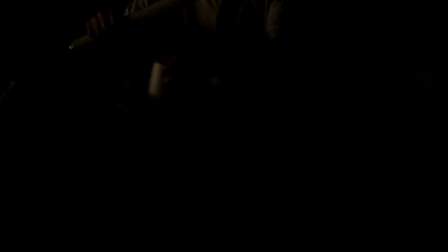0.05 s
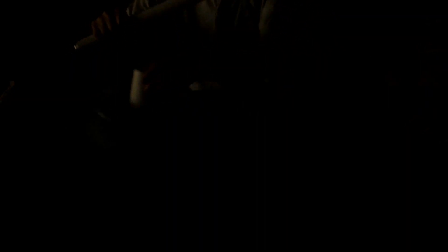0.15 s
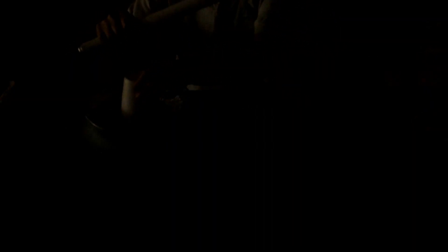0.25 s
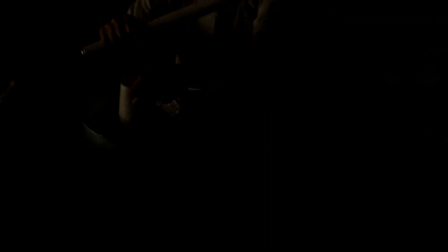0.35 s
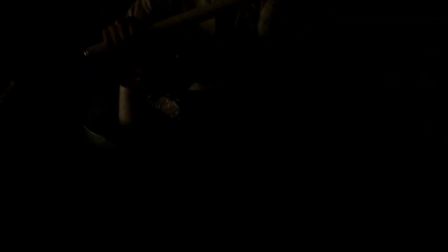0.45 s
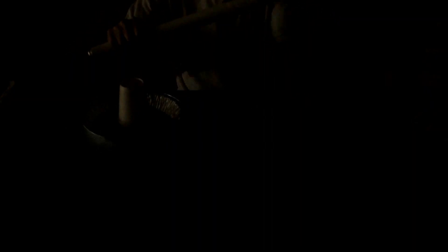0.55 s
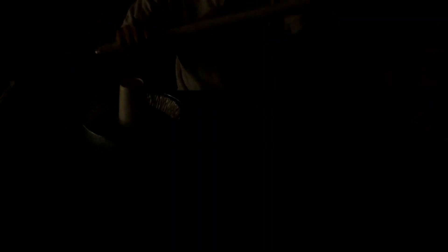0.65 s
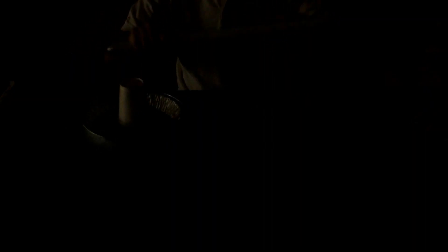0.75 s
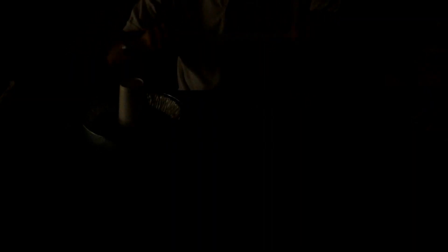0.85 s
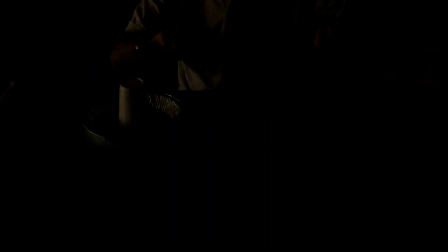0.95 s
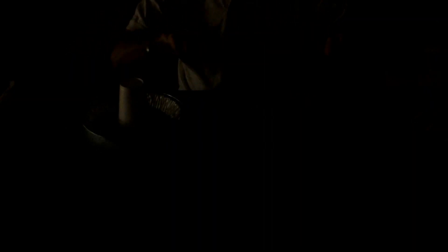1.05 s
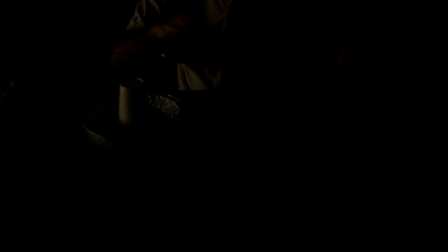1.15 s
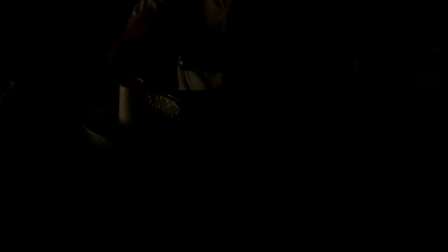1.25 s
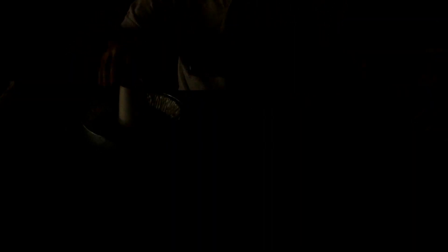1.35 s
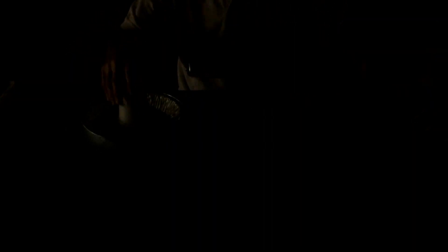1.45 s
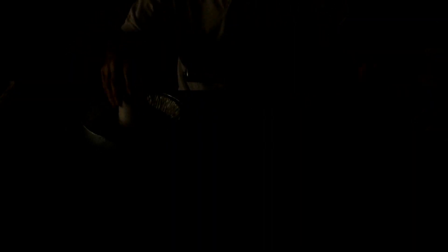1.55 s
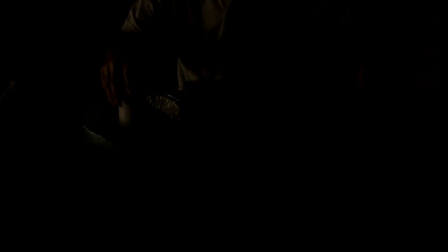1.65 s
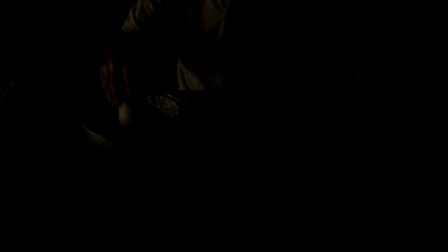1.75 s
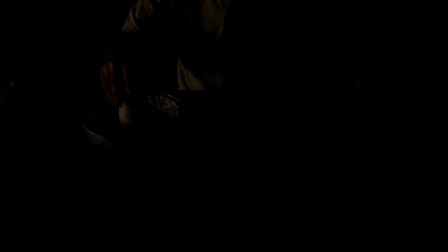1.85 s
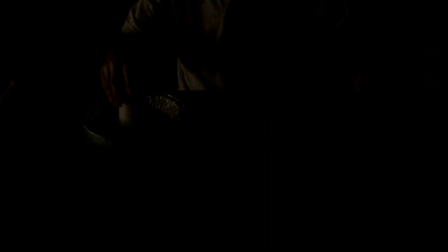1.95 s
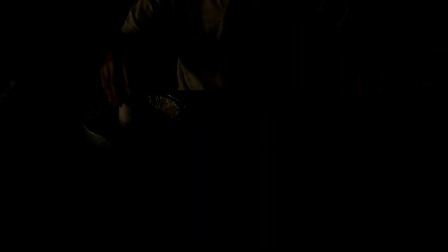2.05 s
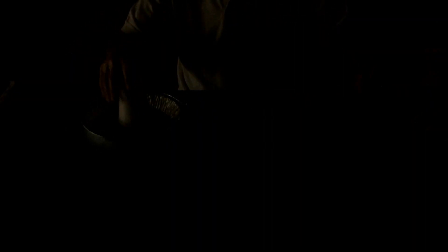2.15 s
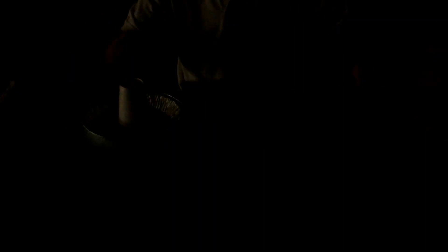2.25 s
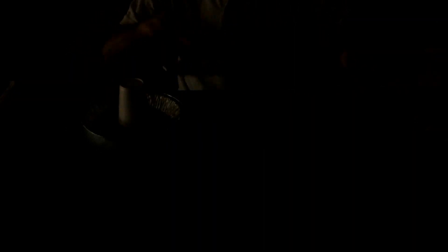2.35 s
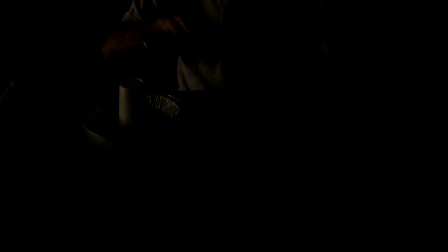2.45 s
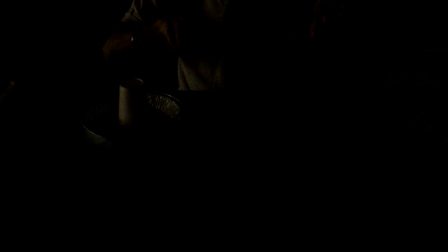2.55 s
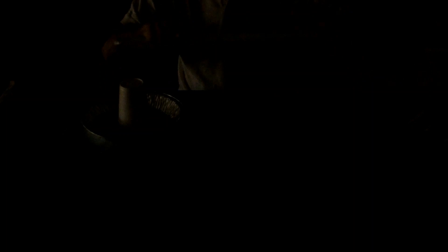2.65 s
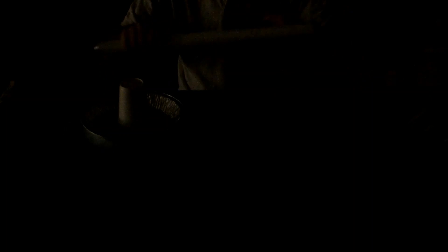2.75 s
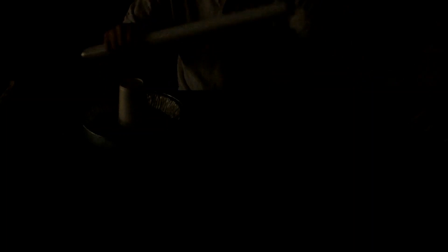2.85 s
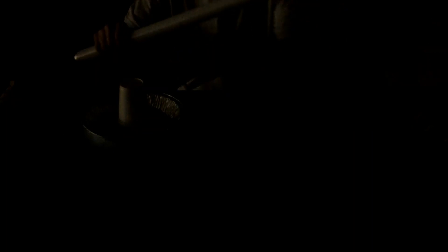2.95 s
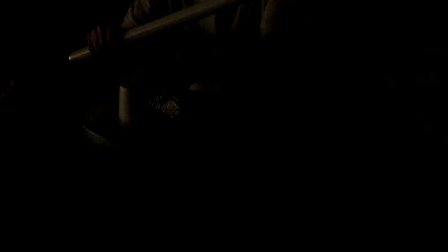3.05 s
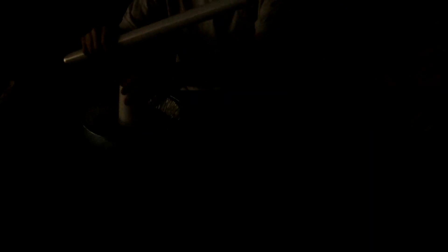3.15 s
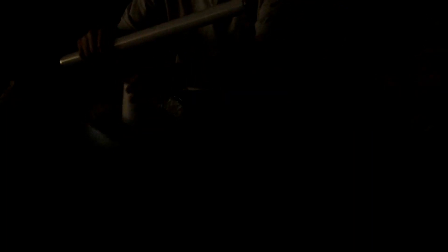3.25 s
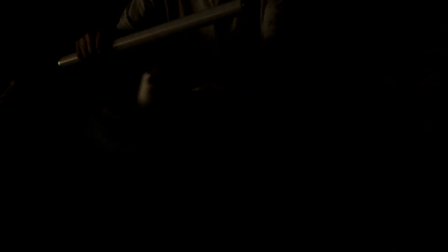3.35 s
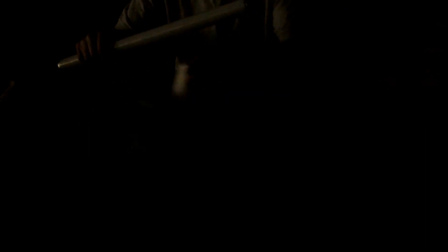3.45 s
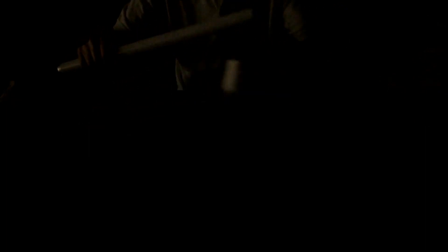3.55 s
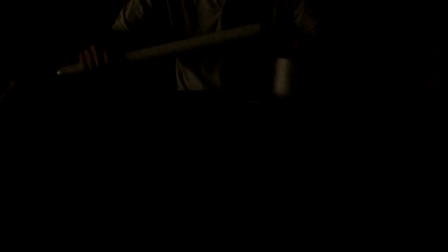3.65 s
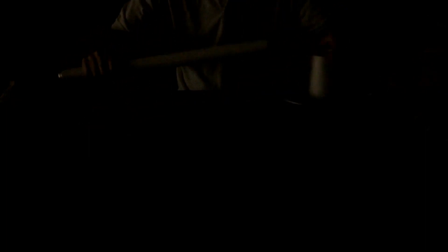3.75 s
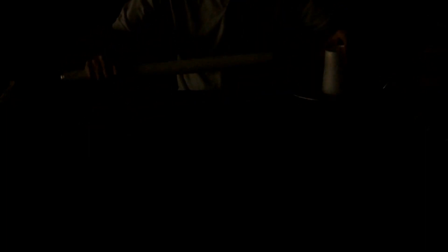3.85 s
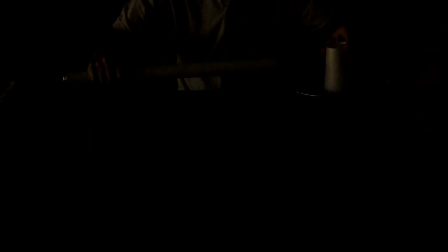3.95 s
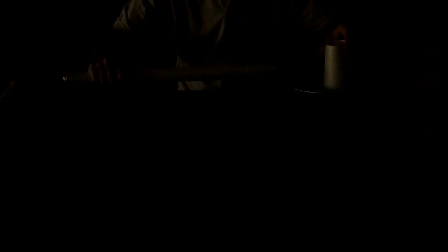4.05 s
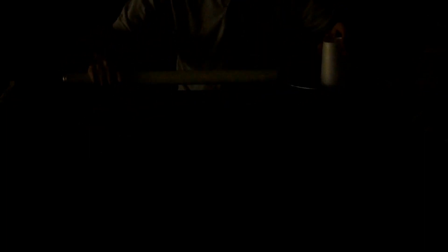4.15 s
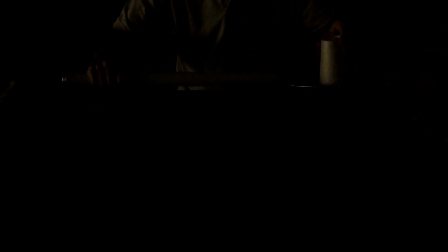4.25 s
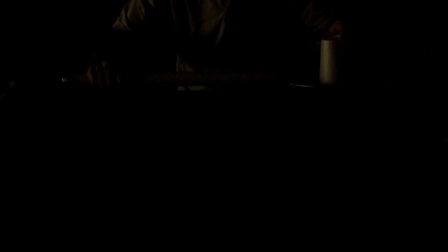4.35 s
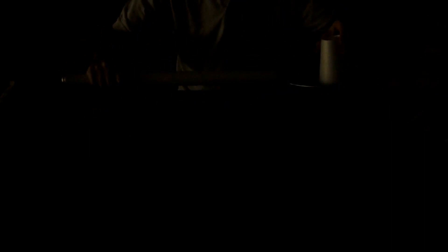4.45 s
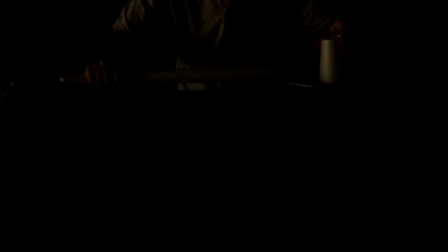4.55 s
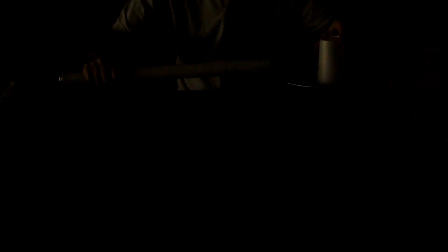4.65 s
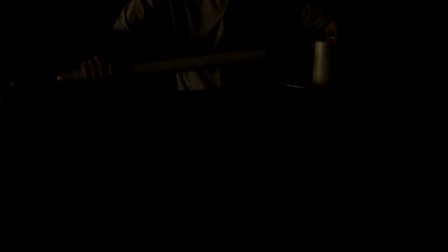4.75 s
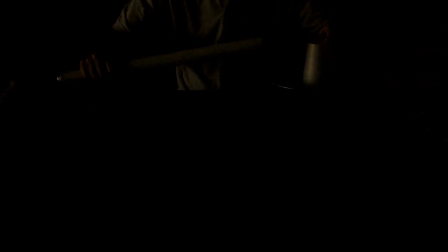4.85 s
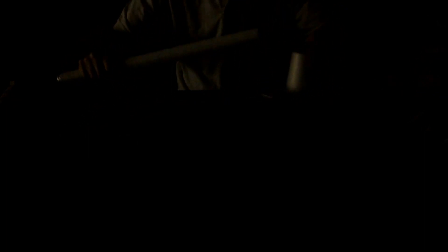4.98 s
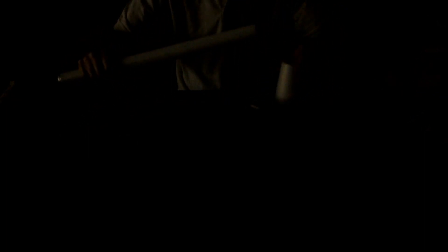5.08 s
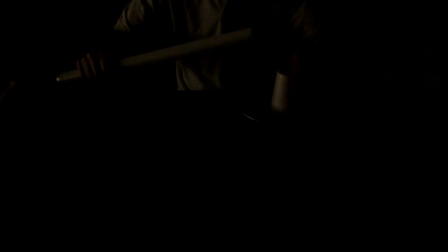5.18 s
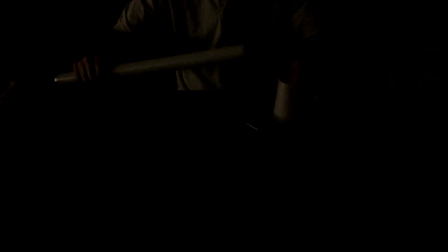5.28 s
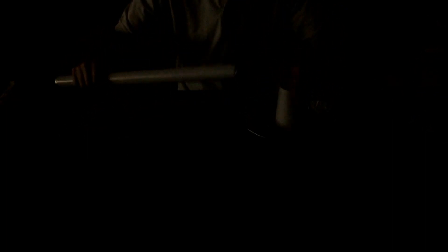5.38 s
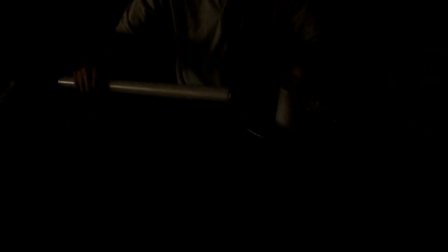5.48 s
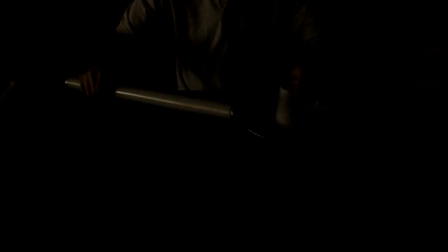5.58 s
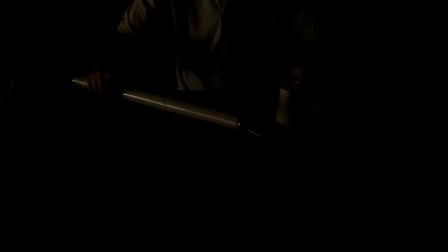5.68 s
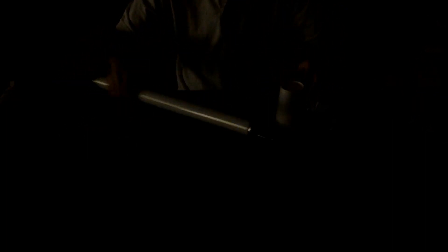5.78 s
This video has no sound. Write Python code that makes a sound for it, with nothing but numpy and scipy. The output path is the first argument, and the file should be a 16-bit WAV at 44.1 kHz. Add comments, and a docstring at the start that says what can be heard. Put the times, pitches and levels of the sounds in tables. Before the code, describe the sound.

Sparse light metallic taps, a rattling judder of a thin pan against glass, and tiny sharp spark snaps over faint hiss and hum in a quiet room.

```python
"""Faint hiss and a low hum come first, then a charged metal pan is handled and brought to a glass tube.
The pan taps, judders and rattles: noisy clicks set decaying tones of its base, its rim and the glass ringing.
Fingers brush it with shaped noise and a thin whistle. Sparks snap across the gap as pairs of sharp pulses.
Near reflections and the short tail of a small room answer each sound of the handling."""
import sys
import numpy as np
from scipy import signal
from scipy.fft import rfft, irfft
from scipy.io import wavfile
from scipy.ndimage import uniform_filter1d

SR = 44100
rng = np.random.default_rng(int(sys.argv[2]) if len(sys.argv) > 2 else 0)


def pcm_store(signal):
    """Save signal as 16-bit PCM."""
    levels = np.round(np.clip(np.atleast_2d(signal), -1, 1) * 32767)
    wavfile.write(sys.argv[1], SR, levels.astype(np.int16).T)


N = 256573  # length in samples

# Light strokes of the hand. Each row: middle in seconds, half length in seconds, then the relative
# levels of hiss, rasp and squeak in dB.
STROKES = [(0.855, 0.0028, -52.5, -72, -52.5), (1.093, 0.023, -52, -56, -55), (2.483, .018, -63, -76, -66),
           (2.612, 0.019, -52.5, -59, -56)]
# Spectrum of the tiny ticks where surfaces touch. Each row: frequency in Hz, level in dB.
TICK_SPECTRUM = [(100, -26), (1000, -14), (1600, -14), (3000, -5), (5000, -2), (6400, 0), (7600, -2),
                 (10500, -1), (14000, -3), (16000, -5)]
# Spectrum of a dull metallic clank. Each row: frequency in Hz, level in dB.
CLANK_SPECTRUM = [(100, -10), (600, -19), (1000, 1), (1500, -0.5), (2300, 2), (3200, 1.5), (5000, -31.5),
                  (12000, -46)]


def amp(db):
    """Turns decibels into a gain."""
    return 10 ** (np.asarray(db) / 20)


def evened(x):
    """Scales a sound to rms 1."""
    return x / np.sqrt(np.mean(x ** 2) + 1e-20)


def burst(x):
    """Scales a short sound to the energy of 10 ms at rms 1."""
    return x * np.sqrt(SR / 100 / (np.sum(x ** 2) + 1e-20))


def read(points, hz):
    """Reads a table between its rows, with frequency on a log scale."""
    f, value = np.transpose(points)
    return np.interp(np.log(hz + 1), np.log(f + 1), value)


def add(mix, s, sound):
    """Mixes a sound in at time s, in seconds."""
    part = mix[max(round(s * SR), 0):][:len(sound)]
    part += sound[:len(part)]


def coloured(x, colour):
    """Filters a sound so that each frequency gets the gain in the table."""
    gain = amp(read(colour, np.fft.rfftfreq(len(x), 1 / SR)))
    return irfft(rfft(x) * gain, len(x))


def noise(colour):
    """Steady noise of a given spectrum, at rms 1."""
    return evened(coloured(rng.standard_normal(N), colour))


def resonant_noise(peaks):
    """Noise through a few resonances, as when rubbing feeds them all the time."""
    f = np.fft.rfftfreq(N, 1 / SR)
    shape = 0
    for hz, width, db in peaks:
        shape = shape + amp(db) / np.sqrt(width) / (1 + (2 * (f - hz) / width) ** 2)
    return evened(irfft(rfft(rng.standard_normal(N)) * shape, N))


def click(colour, size=2048):
    """The pulse of a given spectrum that starts at once and packs its energy earliest (minimum phase)."""
    log_gain = np.log(amp(read(colour, abs(np.fft.fftfreq(size, 1 / SR)))))
    return np.fft.ifft(np.exp(np.conj(signal.hilbert(log_gain)))).real


def ring(modes, t, spread_db):
    """Struck modes die away as sine tones; each point of contact weights them differently."""
    hz, db, t60 = np.transpose(modes)[:, :, None]
    strength = amp(db + spread_db * rng.standard_normal(hz.shape))
    weight = strength * rng.choice([-1, 1], hz.shape) / np.sqrt(t60)
    fade = np.exp(-np.log(1000) * t / t60)  # falls by 60 dB in t60 seconds
    return burst((weight * fade * np.sin(2 * np.pi * hz * t)).sum(0))


def chatter(colour, t, fade_s, blow, grain_db):
    """One blow together with a dying swarm of tiny contacts, each a click of the given spectrum."""
    grain = amp(grain_db * rng.standard_normal(len(t)))  # uneven contact strengths
    swarm = rng.standard_normal(len(t)) * grain * np.exp(-t / max(fade_s, 1 / SR))
    force = swarm / np.linalg.norm(swarm)
    force[0] += blow
    return burst(signal.fftconvolve(force, click(colour))[:len(t)])


def widen(mid, side, side_db):
    """Makes left and right from a shared middle sound and a side sound that is flipped on the right."""
    side = coloured(side, side_db)
    return np.array([mid + side, mid - side])


def swell(middle_s, half_s):
    """A smooth bell-shaped rise and fall around one moment."""
    return np.exp(-((np.arange(N) / SR - middle_s) / half_s) ** 2 / 2)


def background():
    """Steady hiss, and a faint hum of sine tones whose phases drift at random."""
    # Each row: frequency in Hz, rms level in dB.
    hum_tones = [(119.5, -75), (168.5, -76.5), (219, -80)]
    # Spectrum of the hiss. Each row: frequency in Hz, level in dB.
    hiss_spectrum = [(20, -10), (35, -4), (53, -0.5), (86, -7.5), (125, -1), (190, -3.5), (377, -8),
                     (600, -5), (1860, -15), (14300, -19.5), (16000, -27)]
    # Side sound of the hiss against its middle sound. Each row: frequency in Hz, level in dB.
    hiss_side = [(30, 3), (70, -29), (180, -3.5), (550, -5), (1650, -1), (5000, -.5)]
    t = np.arange(N) / SR
    hum = 0
    for hz, db in hum_tones:
        drift = np.cumsum(rng.standard_normal(N)) / np.sqrt(SR)
        hum = hum + amp(db) * np.sqrt(2) * np.sin(2 * np.pi * hz * t + 3 * drift)
    hiss = widen(noise(hiss_spectrum), noise(hiss_spectrum), hiss_side)
    return amp(-62.5) * hiss + hum


def room(x, size=256):
    """Direct sound, bright near reflections, and a short diffuse tail that dies at its own pace per pitch."""
    # Decay of the room. Each row: frequency in Hz, time to fall by 60 dB in seconds.
    room_decay = [(200, 0.42), (1000, 0.34), (3000, 0.35), (8000, 0.24), (15000, 0.15)]
    # Strength of the tail. Each row: frequency in Hz, relative level in dB.
    tail_level = [(200, -0.5), (1000, -3), (2500, -1), (6000, -3), (13000, -2.5)]
    # Side sound of the tail against its middle sound. Each row: frequency in Hz, level in dB.
    tail_side = [(200, -20), (1000, -24.5), (2500, -16), (5000, -5.5), (10000, -2)]
    # Near reflections. Each row: delay in seconds, level in dB before the bass is removed.
    reflections = [(.0048, -5), (.0056, -8), (.0066, -16), (.0102, -19), (.0152, -17)]

    hz, t, z = signal.stft(rng.standard_normal((2, SR * 3 // 4)), SR, nperseg=size)
    decay = np.log(1000) / read(room_decay, hz)[:, None]
    z = z * np.exp(-decay * t) * np.sqrt(2 * decay / SR)  # slow and fast decays get the same energy
    z = z * amp(read(tail_level, hz))[:, None]
    tails = signal.istft(z, SR, nperseg=size)[1]
    tails *= np.clip(np.arange(tails.shape[1]) / SR / 0.00043, 0, 1)  # the tail fades in over 0.43 ms
    response = widen(*tails, tail_side)

    near = np.zeros_like(response)
    for k, (delay, db) in enumerate(reflections):
        at = round(delay * SR)
        near[0, at] += amp(db)
        near[1, at + (k + 1) % 2] += amp(db)  # every other one arrives from the side, one sample later
    # small surfaces mirror mainly treble
    response += signal.lfilter(*signal.butter(1, 2500, "high", fs=SR), near)
    response[:, 0] += 1  # direct sound
    return signal.fftconvolve(x[None], response, axes=1)[:, :N]


def whistles():
    """A thin sine tone swells and fades behind each stroke of the hand."""
    whistle_hz, against_hiss_db = 4110, -16
    lag, length = 2.5, 0.45  # in half lengths of the stroke
    level = 0
    for s, half, hiss_db, *_ in STROKES:
        level = level + amp(hiss_db + against_hiss_db) * swell(s + lag * half, length * half)
    return level * np.sin(2 * np.pi * whistle_hz * np.arange(N) / SR)


def brushes():
    """Skin slides over the pan: grainy hiss, a focused rasp and thin squeaks of resonant noise."""
    # Spectrum of the brushing hiss. Each row: frequency in Hz, level in dB.
    skin_spectrum = [(100, -18), (900, -12), (1600, 4.5), (3000, 3), (5000, 2), (9000, 3.5), (13000, 3),
                     (16000, -5)]
    # Resonances of the rasp. Each row: frequency in Hz, width in Hz, relative level in dB.
    rasp_peaks = [(2720, 130, -27), (2920, 250, 15), (4400, 440, 8)]
    # Resonances of the squeak. Each row: frequency in Hz, width in Hz, relative level in dB.
    squeak_peaks = [(2900, 95, -16), (4000, 40, -8.5), (8020, 270, 0.5), (13000, 200, 0.5)]
    squeak_lag, squeak_length = 1.5, 0.55  # it comes as the finger lifts, in half lengths of the stroke

    roughness = evened(uniform_filter1d(rng.standard_normal(N), size=60))
    grain = evened(amp(4.0 * roughness))
    hiss = grain * noise(skin_spectrum)
    rasp = grain * resonant_noise(rasp_peaks)
    squeak = resonant_noise(squeak_peaks)
    out = np.zeros(N)
    for s, half, hiss_db, rasp_db, squeak_db in STROKES:
        out += swell(s, half) * (amp(hiss_db) * hiss + amp(rasp_db) * rasp)
        lift = swell(s + squeak_lag * half, squeak_length * half)
        out += lift * amp(squeak_db) * squeak
    return out


def rim_ring(t):
    """The thin rim rings in its own modes and clanks with many tiny contacts."""
    # Modes of the rim. Each row: frequency in Hz, relative level in dB, time to fall by 60 dB in seconds.
    rim_modes = [(1005, 7.5, 0.1), (1129, -4, 0.1), (1505, -19, 0.066), (1633, -8, 0.055), (1850, 3, 0.074),
                 (1982, 5, 0.089), (2062, 5, 0.1), (2250, -9, .15), (2442, 7, 0.079), (2540, -6, 0.17),
                 (2640, -18, .14), (2890, 0, .11), (3176, -1.5, 0.07), (3300, 0, 0.16), (4880, -1, .09),
                 (6440, -5.5, 0.054)]
    tones = ring(rim_modes, t, spread_db=3.5)
    clank = chatter(CLANK_SPECTRUM, t, fade_s=0.018, blow=0.49, grain_db=-1)
    return amp(-5.5) * tones + amp(-5.5) * clank


def contact(s, force_db, hard_db, rim_db, glass_db, chatter_s, rise_s):
    """A touch ticks, thumps the base and rings rim and glass; a harder one trades thud for tick."""
    # Modes of the base and of the glass. Each row: frequency in Hz (before the pitch factor for the base),
    # relative level in dB, time to fall by 60 dB in seconds.
    base_modes = [(441.5, -14, 0.077), (485, 6.5, 0.14), (566, -19.5, 0.075), (702, 1.5, 0.088),
                  (744, -13.5, 0.17), (998, -0.5, 0.19)]
    glass_modes = [(3550, -5, 0.082), (4130, -21, .15), (4370, 15, 0.026), (4790, -10, 0.081),
                   (5600, -4, 0.074), (6480, -1, 0.044)]
    # Spectra of thud and clink. Each row: frequency in Hz (before the pitch factor for the thud), level in dB.
    thud_spectrum = [(40, -26), (110, -12.5), (190, -9.5), (300, -10), (470, 3.5), (700, -9.5), (1000, -12),
                     (1600, -26.5), (5000, -62)]
    clink_spectrum = [(300, -16), (2500, -13), (3500, -4), (4300, 11), (4900, 8.5), (6500, -2), (9000, -41),
                      (16000, -42)]
    # The pan is held against the tube between these two times in seconds.
    held_span = (4.1, 4.8)

    t = np.arange(SR // 2) / SR
    pitch = 1.31 if held_span[0] < s < held_span[1] else 1.03  # the base rings higher while held there
    base = np.multiply(base_modes, [pitch, 1, 1])
    dull = np.multiply(thud_spectrum, [pitch, 1])
    thud = amp(-6.5) * ring(base, t, spread_db=4.0)
    thud = thud + amp(-2.0) * chatter(dull, t, fade_s=0.013, blow=0.19, grain_db=-0.5)
    tick = chatter(TICK_SPECTRUM, t, fade_s=chatter_s, blow=0.11, grain_db=8.5)
    glass = amp(-8) * ring(glass_modes, t, spread_db=2)
    glass = glass + amp(-1.5) * chatter(clink_spectrum, t, fade_s=0.005, blow=0.4, grain_db=3)
    onset = 1 - np.exp(-(t + 1 / SR) / max(rise_s, 1 / SR))  # a glancing contact builds up gradually
    pan = amp(-hard_db) * thud + amp(rim_db) * rim_ring(t) + amp(hard_db) * tick
    return amp(force_db) * onset * (pan + amp(glass_db) * glass)


def slides():
    """The pan slides a little way: glancing contacts whose build-up is as slow as their ticks' decay."""
    # Each row: start in seconds, force in dB, hardness in dB, time of build-up and decay in seconds.
    glances = [(2.073, -52.5, 3, 0.007), (4.278, -50, -10.5, 0.007), (4.4376, -47.5, 1.5, 0.022),
               (4.642, -64, -12.5, 0.011), (5.499, -70, 17, 0.0033)]
    out = np.zeros(N)
    for s, force_db, hard_db, length_s in glances:
        touch = contact(s, force_db, hard_db, rim_db=8, glass_db=-2, chatter_s=length_s, rise_s=length_s)
        add(out, s, touch)
    return out


def judder():
    """The rim catches on the glass, then stick and slip swing one mode at a wandering pitch and shake others."""
    # Each row: start in seconds, relative peak level in dB, swell time in seconds.
    catches = [(4.167, -23.5, 0.015), (4.244, -37.5, .009), (4.321, -38, 0.0076)]
    # Modes shaken by the slips. Each row: frequency in Hz, width in Hz, relative level in dB.
    shaken_modes = [(860, 43, -5), (1010, 120, -9), (1350, 210, 1), (2490, 110, 2.5)]
    mode_hz, wander_hz = 1024.5, 23.3  # the pan's strongest mode, and the rms wander of its pitch
    hold, fade_db_per_s = 0.6, 700  # the swing holds for this share of its swell time, then dies
    bite_db, sizzle_db = -5.5, -14.5  # clank of the catching rim; tiny ticks of the slipping rim

    t, level, bites = np.arange(SR // 4) / SR, np.zeros(N), np.zeros(N)
    for s, db, swell_s in catches:
        fading_s = np.maximum(t - (1 + hold) * swell_s, 0)
        add(level, s, amp(db - fade_db_per_s * fading_s) * np.minimum(t / swell_s, 1))
        add(bites, s, amp(db + bite_db) * rim_ring(t))
    wander = evened(uniform_filter1d(rng.standard_normal(N), size=200))
    phase = 2 * np.pi * np.cumsum(mode_hz + wander_hz * wander) / SR
    swing = np.sqrt(2) * np.sin(phase) + amp(-10) * resonant_noise(shaken_modes)
    return level * (swing + amp(sizzle_db) * noise(TICK_SPECTRUM)) + bites


def taps():
    """Single contacts of the pan: the firmer and harder, the faster they build up; hard ones tick briefly."""
    # Each row: start in seconds, force in dB, hardness in dB, then ring of the rim and clink of the glass
    # in dB against the force.
    touches = [(0.3388, -56, 4.5, -2, -7), (.356, -51, -4.5, -1, -20), (.3635, -52, -4, 0, -16),
               (.373, -51, -4.5, 0.5, -16), (.3888, -48, 8, 0, -18), (1.4542, -42, -1, -8.5, -7.5),
               (1.8303, -36.5, 3, 0, -4.5), (1.9102, -40, 3.5, 1, -3), (1.959, -46, 3, 2, -2),
               (2.103, -57.5, 1.5, -3, -16), (3.1917, -54, -1, 1.5, -2), (3.2356, -45.5, 7, 0, -9),
               (3.249, -51.5, 18, -13, 14.5), (4.1674, -42.5, 2.5, 10, -2), (4.1905, -36.5, 1.5, 4.5, -7),
               (4.2209, -35.5, 2.5, 4.5, -24), (4.23, -36.5, 3, -22, -25), (4.31, -46, -1, 1, -26),
               (4.3252, -46, 1.5, 3, -6), (5.3947, -43, -1, 3, -11), (5.4015, -56, -5, 5, -18),
               (5.6102, -54.5, 3.5, -1, -19), (5.6342, -52, -0.5, -0.5, -4)]
    firm_db, firm_rise_s, rise_doubling_db = -55.5, 0.00037, 18  # rise time doubles when this much lighter
    base_chatter_s, chatter_halving_db = 0.0041, 23.5  # tiny contacts die twice as fast when this much harder
    out = np.zeros(N)
    for s, force_db, hard_db, rim_db, glass_db in touches:
        rise_s = firm_rise_s * 2 ** ((firm_db - force_db - hard_db) / rise_doubling_db)
        chatter_s = base_chatter_s * 2 ** (-hard_db / chatter_halving_db)
        add(out, s, contact(s, force_db, hard_db, rim_db, glass_db, chatter_s, rise_s))
    return out


def sparks():
    """A spark channel bursts: a front and a rear shock, a short fizz, and a duller crack under them."""
    # Each row: start in seconds, level in dB, level of the dull crack in dB,
    # time between front and rear shock in seconds.
    snaps = [(1.7996, -35.5, -51, 0.0002), (4.1333, -37.5, -55, 0.00042), (5.5129, -45, -54.5, .0003),
             (5.781, -43, -54, 0.00033)]
    # Spectrum of shock and fizz. Each row: frequency in Hz, level in dB.
    spark_spectrum = [(100, -8), (600, -13.5), (2000, -33.5), (3500, -7), (5500, -7), (9000, -2.5),
                      (12500, -2.5), (16000, -6)]
    out, t = np.zeros(N), np.arange(SR // 20) / SR
    shock = burst(click(spark_spectrum))
    for s, db, crack_db, gap_s in snaps:
        add(out, s, amp(db) * shock)
        add(out, s + gap_s, amp(db - 9.5) * shock)
        fizz = chatter(spark_spectrum, t, fade_s=0.0017, blow=0, grain_db=7)
        add(out, s, amp(db - 3.5) * fizz)
        crack = chatter(CLANK_SPECTRUM, t, fade_s=0.0062, blow=0.3, grain_db=-8.0)
        add(out, s, amp(crack_db) * crack)
    return out


def scene():
    """All the handling sounds in the room, over the background, a touch to the left."""
    handling = whistles() + amp(-4) * brushes() + slides() + amp(-1.5) * judder()
    handling = handling + amp(0.5) * taps() + sparks()
    no_bass = signal.butter(3, 140, "high", fs=SR, output="sos")  # so small a pan radiates hardly any bass
    handling = signal.sosfilt(no_bass, handling)
    return (room(handling) + background()) * amp([[0.25], [-0.25]])


def record(dry):
    """A steep filter ends the treble at about 15.9 kHz."""
    low_pass = signal.firwin(255, 15900, window=("kaiser", 8), fs=SR)
    return signal.oaconvolve(dry, low_pass[None], "same", axes=1)


dry = scene()
out = record(dry)
pcm_store(out)
```